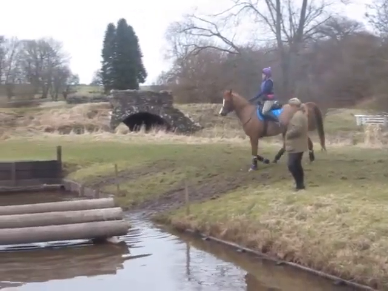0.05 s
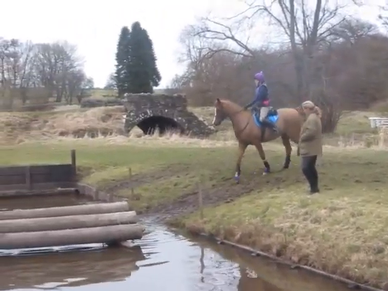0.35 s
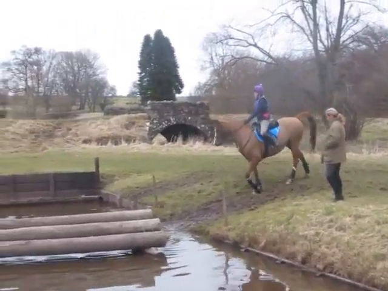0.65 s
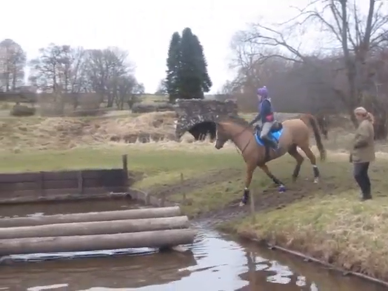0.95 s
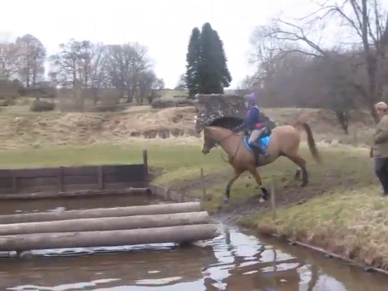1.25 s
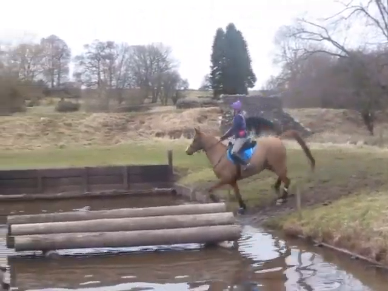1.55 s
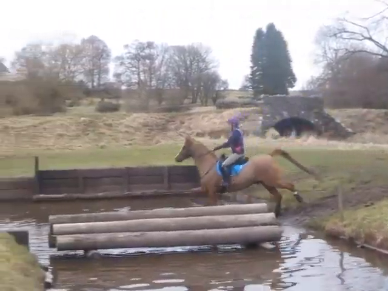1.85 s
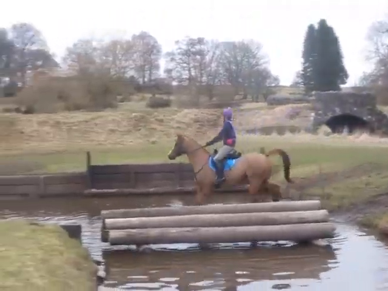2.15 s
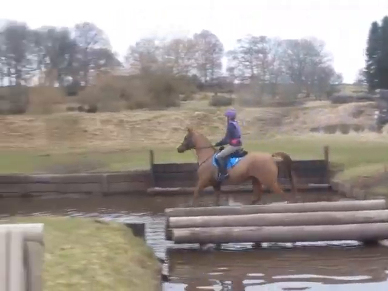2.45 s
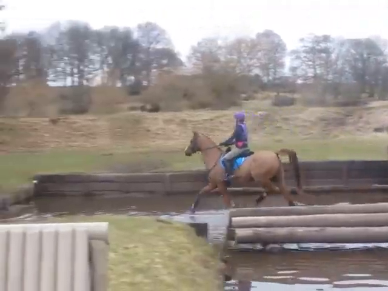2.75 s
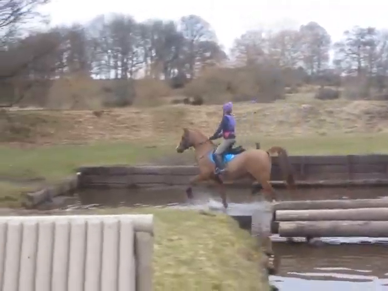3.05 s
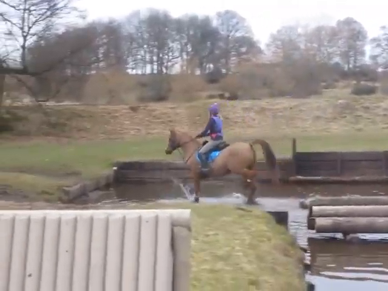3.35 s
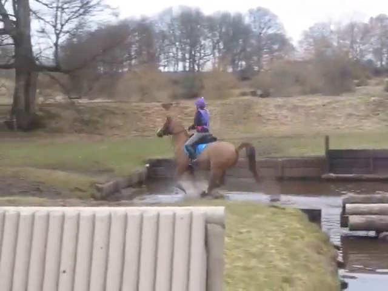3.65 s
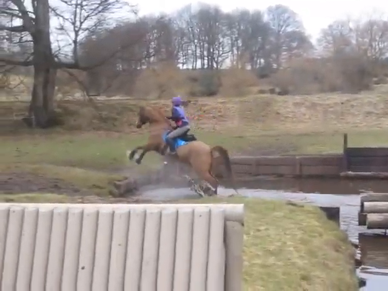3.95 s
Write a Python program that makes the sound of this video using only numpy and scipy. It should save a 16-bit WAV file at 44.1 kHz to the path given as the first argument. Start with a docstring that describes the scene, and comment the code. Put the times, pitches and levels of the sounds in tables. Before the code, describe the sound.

A horse splashing through shallow water, with wind buffeting the microphone and faint birds.

```python
"""A shallow pond with a muddy bank, some way from a handheld camera, with trees behind.
A horse comes down the bank and canters through the water. Its hooves squelch in the mud, then plunge:
each throws up water that falls back as spray, and trapped air rings as bubbles.
Gusts buffet the microphone's two openings and make the camera turn its volume down.
Small birds chirp in the trees, over a steady far rustle."""
import sys
import numpy as np
from scipy import signal
from scipy.fft import rfft, irfft
from scipy.io import wavfile
from scipy.ndimage import uniform_filter1d

SR = 44100
rng = np.random.default_rng(int(sys.argv[2]) if len(sys.argv) > 2 else 0)


def master_out(mix):
    """Clip the mix to full scale and print it as 16-bit PCM to the path in sys.argv[1]."""
    frames = np.transpose(np.atleast_2d(mix))
    ceiling = np.clip(frames, -1, 1)
    pcm = np.round(ceiling * 32767).astype(np.int16)
    wavfile.write(sys.argv[1], SR, pcm)


N = 176400  # 4 seconds
TIME = np.arange(N) / SR


def splashes():
    """Each hoof tears the water into drops and small bubbles, then drags down larger bubbles."""
    # Hooves striking water: start_s, rise_s, hold_s, level_db, plunge_db (added for the deep part)
    strikes = [(1.432, 0.041, 0.067, -38, -8), (1.815, 0.013, 0.07, -34.5, -7.5),
               (2.077, 0.042, 0.14, -34.5, -4), (2.439, 0.12, 0.029, -34.5, -5.5),
               (2.735, 0.068, 0.055, -41.5, -12), (2.844, 0.06, 0.081, -38, -1.5),
               (3.184, 0.039, 0.038, -36, -12.5), (3.306, 0.046, 0.018, -35, 0.5),
               (3.572, 0.012, 0.1, -33, 0), (3.752, 0.043, 0.065, -35.5, 4)]
    # Tone of the torn surface: pitch_hz, level_db
    slosh_tone = [(200, -12), (500, 0), (900, 0), (1500, 2.5), (2300, -2), (3100, -3.5), (3900, -12),
                  (5300, -10.5), (8000, -13.5), (12000, -68), (15500, -47)]
    # Tone of the air dragged under: pitch_hz, level_db
    plunge_tone = [(120, -3.5), (280, -10), (550, -6.5), (800, -7.5), (1200, -25), (2500, -46)]
    clump_s, clump_db, plunge_lag_s = .005, 1.9, .0067
    strokes = [(amp(db) * swell(start, rise, hold, fall_s=.051), plunge_db)
               for start, rise, hold, db, plunge_db in strikes]
    froth = drops(3500, spread_db=3.1)
    froth += amp(-.5) * bubbles(1100, 704, 5000, cycles=22, glide=.049, spread_db=3.3)
    froth *= amp(clump_db * wander(clump_s)[0])  # water flies in clumps
    slosh = sum(stroke for stroke, _ in strokes) * colour(froth, slosh_tone)
    depth = sum(stroke * amp(plunge_db) for stroke, plunge_db in strokes)
    late_depth = np.interp(TIME - plunge_lag_s, TIME, depth)
    big_bubbles = bubbles(900, 208.3, 1420, cycles=6.1, glide=.058, spread_db=5)
    plunge = late_depth * colour(big_bubbles, plunge_tone)
    return place(slosh + plunge, side_db=-29, right_db=1.5)


def slaps():
    """Hooves smack mud or water: short bursts of noise, dulled by distance."""
    # Hoof smacks: time_s, level_db, centre_hz
    hits = [(.547, -42.5, 4440), (0.57, -34, 2150), (0.643, -35.5, 2140), (0.65, -39, 6900),
            (.868, -38.5, 4130), (1.087, -41, 5000), (1.122, -35.5, 1530), (1.167, -48, 1700),
            (1.323, -40, 7900), (1.369, -32.5, 1430), (1.433, -44, 3460), (1.474, -30.5, 2500),
            (1.715, -34, 1570), (1.786, -31, 1180), (1.832, -27, 3200), (1.859, -28.5, 1590),
            (1.967, -42.5, 7000), (2.1, -34, 1940), (2.207, -25, 1800), (2.31, -41, 3970),
            (2.372, -31, 4540), (2.585, -32, 1700), (2.905, -35.5, 1610), (2.946, -29, 2040),
            (3.018, -29.5, 1040), (3.22, -49, 1530), (3.29, -30, 1720), (3.348, -22, 1400),
            (3.398, -29, 2050), (3.581, -26, 1180), (3.605, -26, 1450), (3.673, -23.5, 2380),
            (3.784, -27, 2300), (3.826, -25, 1277)]
    half_width_octaves, top_hz = .8, 8500
    out = np.zeros((2, N))
    for start, db, centre_hz in hits:
        edges_hz = [centre_hz / 2 ** half_width_octaves, centre_hz * 2 ** half_width_octaves]
        smack = swell(start - .001, rise_s=.0012, hold_s=.00017, fall_s=.0038)
        burst = filtered((smack + 1e-12) * rng.standard_normal((2, N)), "bandpass", edges_hz)
        out += amp(db) * unit(burst) * np.sqrt(np.mean(smack ** 2))
    return place(filtered(out, "lowpass", top_hz), side_db=-14.5, right_db=1.5)


def plops():
    """Air pockets pop in mud or close over a sunken hoof, ringing briefly as their pitch rises."""
    # Large single bubbles: start_s, peak_db, pitch_hz
    pockets = [(1.066, -45, 794), (1.087, -33.5, 700), (1.143, -33, 520), (1.164, -34, 1290),
               (2.975, -25, 317), (3.016, -23.5, 725), (3.312, -21.5, 680), (3.62, -22, 433),
               (3.763, -17, 262), (3.815, -28, 565), (3.84, -19.5, 540)]
    fade_cycles, rise_per_s = 2.9, 7.9
    out = np.zeros(N)
    for start, db, hz in pockets:
        age = np.clip(TIME - start, 0, .1)
        ring = np.sin(2 * np.pi * hz * age * (1 + rise_per_s * age / 2))
        out += amp(db) * ring * np.exp(-age * hz / fade_cycles)
    return np.array([out, out])


def mud():
    """Wet ground crackles and pops as each hoof presses in."""
    # Steps on the bank: start_s, hold_s, level_db
    squelches = [(0.537, 0.079, -47), (0.632, 0.05, -53), (1.045, 0.037, -42.5), (1.117, 0.0036, -41.5),
                 (1.145, 0.013, -37.5), (1.429, 0.012, -42), (1.565, 0.028, -38.5), (1.736, 0.02, -40)]
    # Tone of wet mud: pitch_hz, level_db
    tone = [(300, -6), (700, 3.5), (1400, 2), (2800, 0.5), (3900, -4.5), (5800, -3), (9000, -15),
            (15500, -36)]
    press = sum(amp(db) * swell(start, rise_s=.0053, hold_s=hold, fall_s=.011)
                for start, hold, db in squelches)
    crackle = drops(1400, spread_db=1.2)
    crackle += amp(-10) * bubbles(900, 703, 8300, cycles=5.4, glide=.037, spread_db=4)
    return place(press * colour(crackle, tone), side_db=-10, right_db=2.5)


def spray():
    """Thrown water rains back on the pond as fine drops."""
    # Showers of drops: start_s, rise_s, hold_s, level_db
    showers = [(1.437, .03, 0.022, -46), (1.817, 0.0066, 0.022, -43), (2.117, 0.02, 0.053, -43),
               (2.296, 0.05, 0.031, -45), (2.508, 0.029, 0.022, -45), (2.87, 0.025, 0.023, -41),
               (3.042, 0.028, 0.013, -39.5), (3.223, 0.077, 0.041, -43.5), (3.438, 0.016, 0.0097, -43.5),
               (3.506, 0.25, 0.047, -36)]
    # Tone of the landing drops: pitch_hz, level_db
    tone = [(800, -7), (2000, -2.5), (3000, 2.5), (3900, -5), (5300, -0.5), (7000, -5.5), (9500, -11),
            (12000, -21), (15500, -25)]
    loudness = sum(amp(db) * swell(start, rise, hold, fall_s=.08) for start, rise, hold, db in showers)
    return place(loudness * colour(drops(3500, spread_db=3.6), tone), side_db=-7.5, right_db=.5)


def wake():
    """Once the horse is in the pond, stirred water keeps fizzing and lapping."""
    # Loudness of the stirred pond: time_s, level_db
    churn = [(1.7, -79), (2.1, -45.5), (2.7, -44.5), (3.15, -43.5), (3.5, -40), (4, -38)]
    # Tone of the stirred pond: pitch_hz, level_db
    tone = [(150, 5), (450, 3), (1000, -0.5), (2000, -1.5), (3000, -3), (3900, -12.5), (5500, -6),
            (8000, -15.5), (12000, -26.5), (15500, -43)]
    fizz = drops(4000, spread_db=1.7)
    fizz += amp(-7) * bubbles(2200, 244, 4450, cycles=12, glide=.058, spread_db=5)
    loudness = amp(curve(churn)) * (TIME > churn[0][0])
    return place(loudness * colour(fizz, tone), side_db=-17, right_db=2)


def wind():
    """Swirling air rumbles, flutters and thumps at the microphone's left and right openings."""
    # Strength of the wind: time_s, level_db
    gusts = [(0, -42.5), (.07, -30.5), (.1, -46), (.19, -46.5), (.24, -23.5), (.3, -39.5), (.43, -29),
             (.57, -21), (.7, -30), (.93, -26.5), (1.04, -33), (1.16, -32.5), (1.33, -18), (1.46, -18.5),
             (1.55, -24.5), (1.63, -21.5), (1.78, -28), (1.88, -24.5), (1.94, -32), (2.12, -27),
             (2.42, -24.5), (2.47, -28), (2.7, -47.5), (2.85, -34.5), (3.13, -54), (3.35, -23),
             (3.45, -40.5), (3.5, -43.5), (3.63, -22), (3.71, -34.5), (3.78, -28), (4, -30)]
    # Tone of the rumble: pitch_hz, level_db
    rumble_tone = [(20, -63), (45, -8), (75, 1), (115, 3), (180, -3.5), (270, -11), (400, -27.5),
                   (600, -40), (1200, -66.5), (4000, -66), (12000, -76)]
    # Bursts of small, fast swirls in the hardest gusts: start_s, hold_s, level_db
    flurries = [(0.476, 0.11, -42.5), (1.308, 0.18, -34.5), (1.6, 0.015, -29.5), (2.025, 0.25, -33.5)]
    # Tone of those small swirls: pitch_hz, level_db
    flutter_tone = [(100, -26), (220, -12), (300, 1), (420, -4.5), (600, -16), (900, -31), (3000, -66)]
    # Which opening faces the wind: time_s, left_minus_right_db
    facing = [(0, -6), (.9, -2.5), (1.3, 1.5), (1.7, -2), (2.2, -9.5), (3.3, 0.5), (3.7, 3.5)]
    # Single swirls that thump one opening: time_s, peak_db, pitch_hz, side (0 left, 1 right)
    thumps = [(0.253, -11, 150, 1), (0.324, -8.5, 152, 1), (.342, -8, 195, 1), (0.416, -4.5, 139, 1),
              (.496, -5, 192, 1), (0.542, 1, 178, 1), (0.658, -6.5, 172, 1), (0.753, -4, 187, 1),
              (0.849, -6.5, 213, 1), (0.89, -0.5, 132, 1), (1.196, -9.5, 194, 0), (1.256, -1.5, 157, 0),
              (1.285, -8, 180, 1), (1.304, -0.5, 146, 0), (1.339, 4, 205, 0), (1.372, -6, 128, 0),
              (1.39, -7.5, 174, 1), (1.409, -3.5, 217, 0), (1.438, -1.5, 170, 0), (1.459, 3, 152, 1),
              (1.488, -8, 155, 0), (1.526, -4, 148, 1), (1.613, 2, 147, 0), (1.624, 3.5, 203, 0),
              (1.661, 3, 188, 1), (1.678, -7, 182, 1), (1.73, -2.5, 157, 1), (1.973, -8.5, 165, 1),
              (2.001, 0, 176, 1), (2.043, -8, 198, 1), (2.06, -5, 267, 1), (2.098, -2.5, 174, 1),
              (2.124, -2.5, 185, 1), (2.145, 5, 197, 1), (2.172, 0.5, 280, 1), (2.224, -0.5, 198, 1),
              (2.275, 3, 161, 1), (2.316, 1.5, 190, 1), (2.385, -5.5, 226, 1), (2.421, -16, 127, 1),
              (2.434, -1, 284, 1), (3.273, -6.5, 179, 0), (3.374, -2, 220, 1), (3.621, -7, 195, 0),
              (3.763, -0.5, 203, 0), (3.957, -9.5, 127.6, 0)]
    lump_s, lump_db, thump_cycles, leak = .011, 2.4, .53, .43
    lumpy_noise = rng.standard_normal((2, N)) * amp(lump_db * wander(lump_s)[0])
    rumble = colour(lumpy_noise, rumble_tone) * amp(curve(gusts))
    bursts = sum(amp(db) * swell(start, rise_s=.026, hold_s=hold, fall_s=.022)
                 for start, hold, db in flurries)
    flutter = bursts * colour(drops(110, spread_db=1.3), flutter_tone)
    balance = amp(np.outer([.5, -.5], curve(facing)))
    openings = amp(6) * (rumble + flutter) * balance
    for peak_s, db, hz, side in thumps:
        near = abs(TIME - peak_s) < .03
        turns = (TIME[near] - peak_s) * hz
        thump = np.cos(2 * np.pi * turns) / np.cosh(2 * turns / thump_cycles)
        openings[int(side), near] -= amp(db) * thump
    return openings - leak * openings[::-1]  # each side leaks upside down into the other


def birds():
    """Thin, wavering whistles, smeared by the branches and echoed by the wood."""
    # Bird notes: start_s, length_s, first_hz, middle_hz, last_hz, level_db
    chirps = [(.003, 0.052, 3900, 5030, 6350, -39.5), (0.127, 0.05, 3950, 5050, 6350, -41.5),
              (1.995, .055, 5100, 4500, 4200, -50), (2.308, 0.046, 6500, 5700, 5300, -41),
              (2.465, 0.07, 6500, 5700, 5400, -45), (2.648, 0.066, 6500, 5700, 5450, -43),
              (2.822, 0.074, 6300, 5620, 5500, -42), (2.995, 0.066, 6500, 5700, 5550, -41),
              (3.845, .07, 4300, 5080, 4150, -38), (3.944, 0.13, 7600, 7430, 7130, -46)]
    song = np.zeros(N)
    waver = 1 + .015 * wander(.0006)[0]
    for start, length, first_hz, middle_hz, last_hz, db in chirps:
        progress = np.clip((TIME - start) / length, 0, 1)
        arc = np.polyfit([0, .5, 1], [first_hz, middle_hz, last_hz], 2)
        hz = np.polyval(arc, progress) * waver
        song += amp(db) * np.sin(np.pi * progress) ** 2 * np.sin(2 * np.pi * np.cumsum(hz) / SR)
    pair = np.array([song, song])
    branches = amp(-5) * echoes(pair, fade_s=.11)
    wood = amp(-6.5) * echoes(pair, fade_s=.7)
    return pair + branches + wood


def air():
    """Trees and fields rustle steadily, far away."""
    # Tone of open country air: pitch_hz, level_db
    tone = [(30, -19), (150, 8.5), (400, 3), (800, 0.5), (1500, -3.5), (2900, -7), (3900, -12.5),
            (5500, -13.5), (8000, -19.5), (12000, -36), (15500, -41)]
    return amp(-48) * place(colour(rng.standard_normal((2, N)), tone), side_db=-3.5, right_db=1.5)


def echoes(sound, fade_s):
    """Sound scatters back from banks and trees, dying away by 60 dB in fade_s."""
    t = np.arange(SR // 2) / SR
    tail = rng.standard_normal((2, len(t))) * np.minimum(t / .0057, 1) * np.exp(-np.log(1000) * t / fade_s)
    return signal.fftconvolve(sound, tail / np.linalg.norm(tail[0]), axes=1)[:, :N]


def drops(per_s, spread_db):
    """Two separate rows of random clicks of uneven size."""
    size = amp(spread_db * np.minimum(rng.exponential(1, (2, N)), 4))
    return unit(size * rng.choice([-1, 1], (2, N)) * (rng.random((2, N)) < per_s / SR))


def bubbles(per_s, low_hz, high_hz, cycles, glide, spread_db, sizes=36):
    """Bubbles of many sizes, each a short ring that rises in pitch."""
    t, out = np.arange(SR // 20) / SR, np.zeros((2, N))
    for hz in np.geomspace(low_hz, high_hz, sizes):
        age = t * hz / cycles
        ring = np.sin(2 * np.pi * hz * t * (1 + glide * np.minimum(age, 2))) * np.exp(-2 * age)
        births = drops(per_s / sizes, spread_db)
        out += signal.oaconvolve(births, unit(ring)[None] * np.sqrt(hz), axes=1)[:, :N]
    return unit(out)


def amp(db):
    """Turns decibels into a multiplier."""
    return 10 ** (np.asarray(db) / 20)


def unit(sound):
    """Scales a sound to an average power of one."""
    return sound / np.sqrt(np.mean(sound ** 2) + 1e-20)


def curve(points):
    """Joins (time_s, value) points with straight lines."""
    return np.interp(TIME, *np.transpose(points))


def swell(start_s, rise_s, hold_s, fall_s):
    """A loudness shape that rises, holds, then dies away."""
    t = TIME - start_s
    return np.clip(t / rise_s, 0, 1) * np.exp(-np.maximum(t - rise_s - hold_s, 0) / fall_s)


def wander(seconds):
    """Two separate rows of smooth random drift; more seconds means slower drift."""
    size = max(int(seconds * SR), 2)
    return unit(uniform_filter1d(uniform_filter1d(rng.standard_normal((2, N)), size), size))


def colour(sound, tone):
    """Shapes a sound with (pitch_hz, level_db) points, then scales it to a power of one."""
    hz, db = np.transpose(tone)
    log_hz = np.log(abs(np.fft.fftfreq(N, 1 / SR)) + 1)
    log_gain = np.log(amp(np.interp(log_hz, np.log(hz), db)))
    response = np.exp(np.conj(signal.hilbert(log_gain)))  # rings after a click, not before it
    return unit(irfft(rfft(sound) * response[:N // 2 + 1], N))


def filtered(sound, kind, hz):
    """Gently keeps the lows, the highs or a band between."""
    return signal.sosfilt(signal.butter(2, hz, kind, fs=SR, output="sos"), sound)


def place(pair, side_db, right_db):
    """Turns two rows into left and right: side_db sets the width, right_db the lean to the right."""
    mid, side = pair[0], pair[1] * amp(side_db)
    return np.array([(mid + side) * amp(-right_db / 2), (mid - side) * amp(right_db / 2)])


def scene():
    """The horse and its echo, with birds, air and wind."""
    horse = mud() + splashes() + spray() + wake() + slaps() + plops()
    return horse + amp(-13) * echoes(horse, fade_s=.25) + birds() + air() + wind()


def record(dry):
    """The camera cuts deep bass, turns down after hard thumps, rounds off peaks and cuts top treble."""
    low_cut_hz, top_hz = 36, 15800
    duck_above_db, duck_share, recover_db_per_s = -17, .42, 45
    sound = filtered(dry, "highpass", low_cut_hz)
    power = signal.lfilter([.0012], [1, -.9988], (sound ** 2).max(0))  # louder side, over about 19 ms
    recovery = recover_db_per_s * TIME
    # The held level jumps up with each peak, then sinks steadily.
    held_db = np.maximum.accumulate(10 * np.log10(power + 1e-12) + recovery) - recovery
    ducked = sound * amp(-duck_share * np.maximum(held_db - duck_above_db, 0))
    rounded = ducked / (1 + ducked ** 4) ** .25
    treble_cut = signal.firwin(511, top_hz, window=("kaiser", 9), fs=SR)
    return signal.oaconvolve(rounded, treble_cut[None], "same")


dry = scene()
out = record(dry)
master_out(out)
```